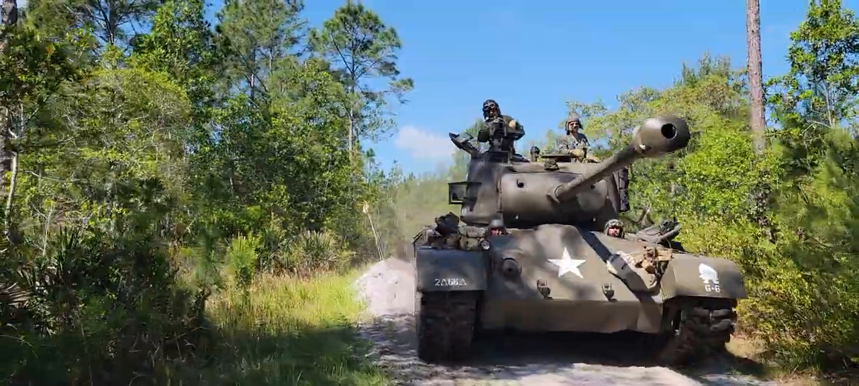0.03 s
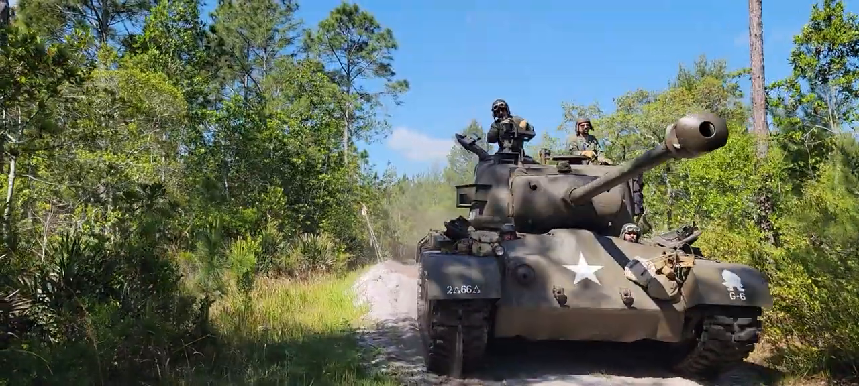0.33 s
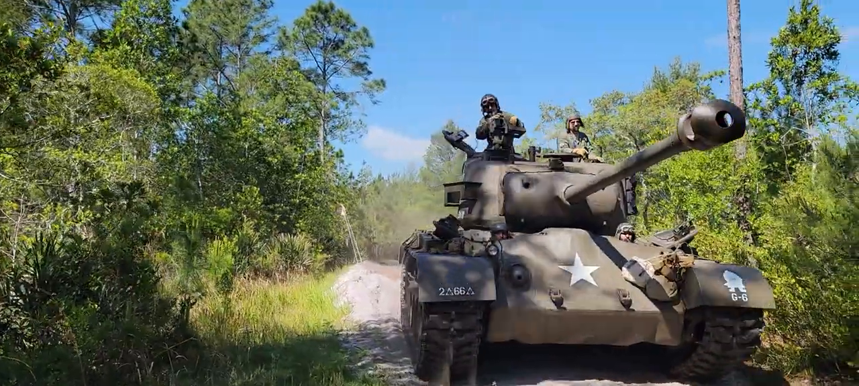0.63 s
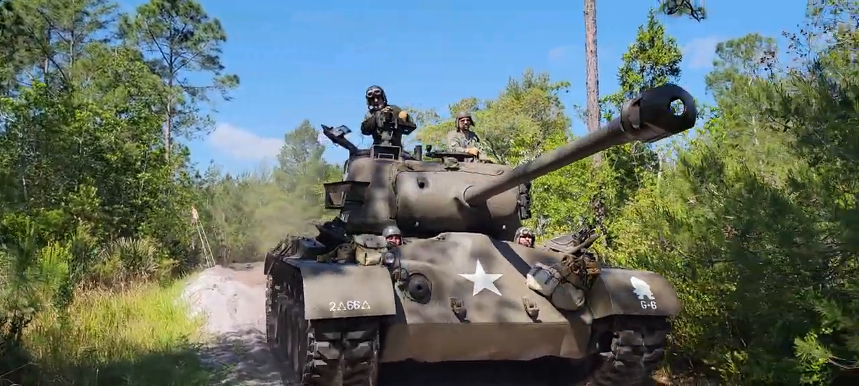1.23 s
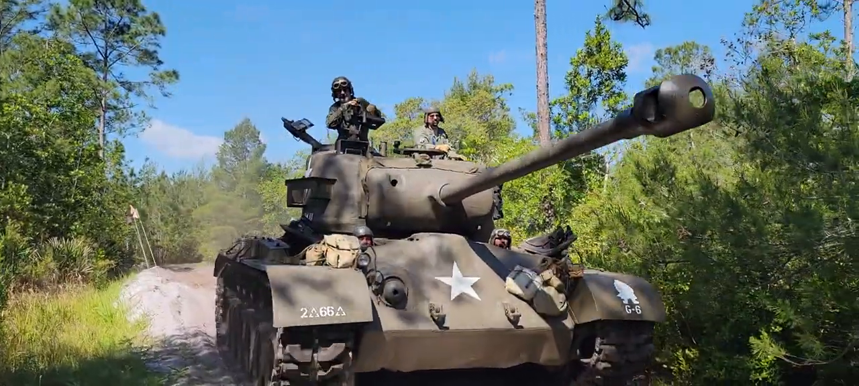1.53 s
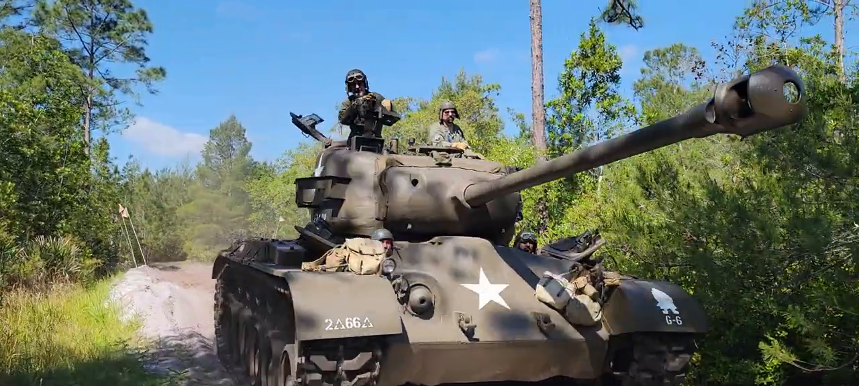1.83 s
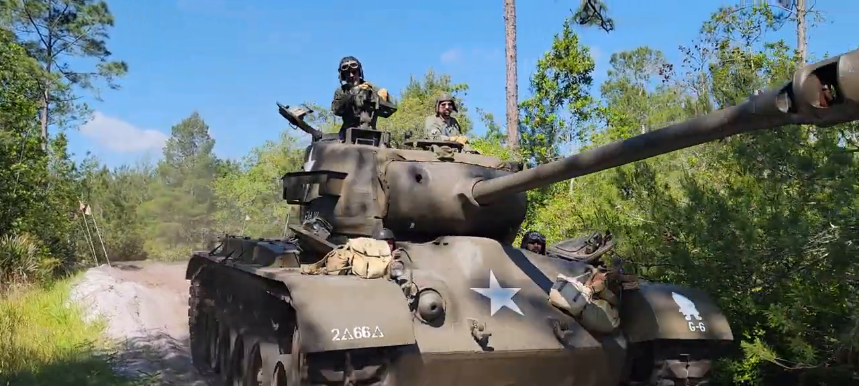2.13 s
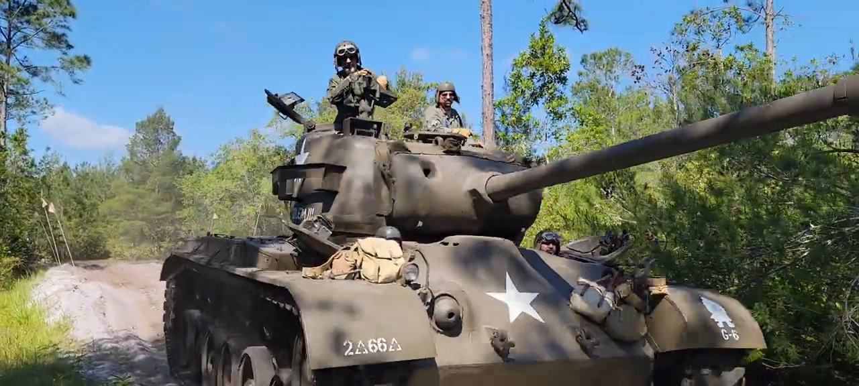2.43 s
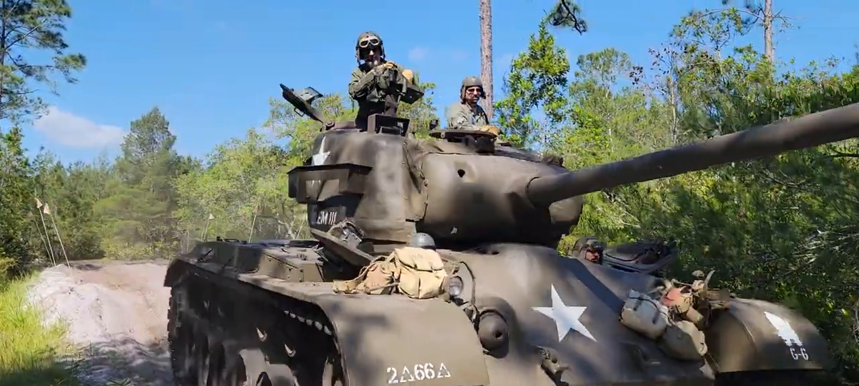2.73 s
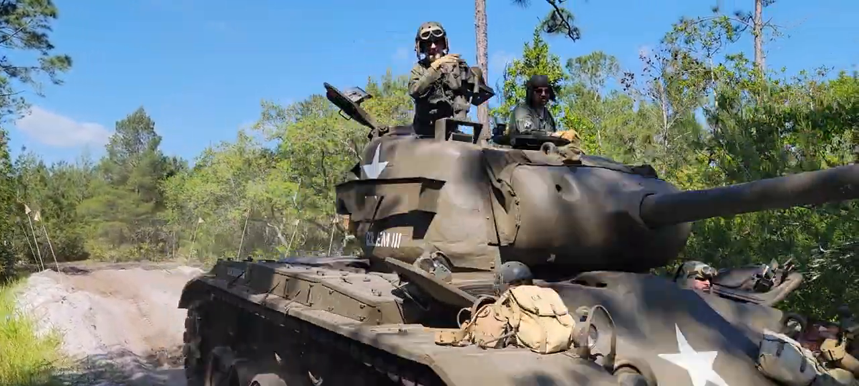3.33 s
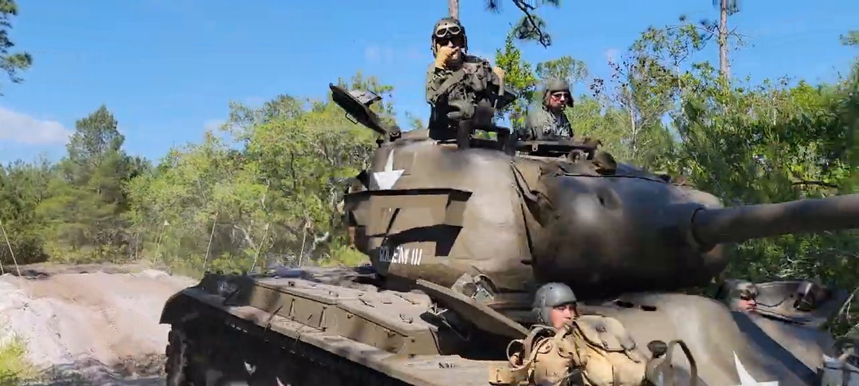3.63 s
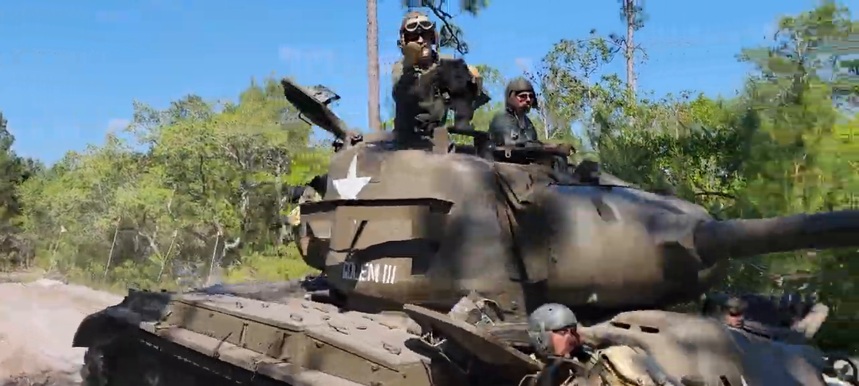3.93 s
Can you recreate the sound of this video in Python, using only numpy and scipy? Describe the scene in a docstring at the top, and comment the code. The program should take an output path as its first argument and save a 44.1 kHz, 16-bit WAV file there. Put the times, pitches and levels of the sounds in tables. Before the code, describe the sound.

The low engine of a tank growls as it speeds up, settles, then picks up again, heading toward the microphone through woods. Its metal tracks clatter and churn sand, with brief high squeaks that come more often later.

```python
"""A tank's V8 revs up, eases off and pulls again as it drives up a sandy woodland track to the listener.
Exhaust pulses give a deep firing note; unequal cylinders add a lope once per crank turn.
The exhaust growls under load and the gears whine faintly. Steel track links rattle and churn the sand;
dry track pins stick and slip in short squeaks that echo off the trees."""
import sys
import numpy as np
from scipy import signal
from scipy.fft import rfft, irfft
from scipy.io import wavfile

SR = 44100
rng = np.random.default_rng(int(sys.argv[2]) if len(sys.argv) > 2 else 0)


def transcribe(signal):
    """Save signal, clipped to [-1, 1], as a 16-bit WAV file at the path in sys.argv[1]."""
    frames = np.atleast_2d(signal).T
    limited = np.clip(frames, -1, 1)
    pcm = np.round(limited * 32767).astype(np.int16)
    wavfile.write(sys.argv[1], SR, pcm)


N = 176400

# engine speed: time_s, firing_hz
ENGINE_SPEED = [(0, 33.3), (0.4, 39.4), (0.55, 43.5), (0.7, 47.6), (0.85, 51.2), (1, 53.6), (1.22, 55.9),
                (1.5, 53.9), (1.75, 51.5), (2, 49.9), (2.3, 48.9), (2.55, 48.7), (2.75, 49.5), (3, 52.3),
                (3.25, 54.4), (3.5, 55.2), (4, 55.5)]
# exhaust note: time_s, then level_db for each of FIRING_MULTIPLES
FIRING_LEVELS = [(0, -42, -16, -23, -27, -44), (0.15, -28, -20, -24, -25, -44),
                 (0.3, -23, -18.5, -18, -23, -43), (0.55, -16, -18, -18, -24, -46),
                 (0.68, -9, -36, -22, -29, -36), (0.85, -9, -24, -22, -37, -38),
                 (1.25, -9, -27, -28, -51, -42), (1.48, -11, -33, -28, -36, -43),
                 (1.68, -14, -37, -24, -34, -38), (1.9, -12, -30, -21, -37, -37),
                 (2.35, -15, -31, -19.5, -37, -27.5), (2.75, -12, -30, -19.5, -28, -22.5),
                 (3.05, -11, -31, -23, -41, -33), (3.4, -12, -38, -26, -31, -32),
                 (4, -13, -29, -23, -29, -32)]
# lines from unequal cylinders: firing_multiple, relative_db
LOPE_LINES = [(1.25, -38), (1.5, -41), (1.75, -38), (2.25, -36), (2.75, -33), (3.25, -31.5), (3.5, -38),
              (3.75, -39), (4.25, -35), (4.75, -36), (5.0, -36), (5.25, -36), (5.75, -35.5), (6.75, -41),
              (7.0, -42), (8.25, -42)]
# exhaust gas blast: time_s, relative_db
BLAST_LEVEL = [(0, -30), (.55, -26), (1.3, -30.5), (1.9, -24.5), (2.8, -20.5), (3.3, -24.5), (4, -23)]
# blast spectrum: freq_hz, density_db
BLAST_SPECTRUM = [(170, -5), (240, -7.5), (300, 0), (380, -1.5), (500, -9), (800, -23)]
# exhaust rumble: time_s, level_db
RUMBLE_LEVEL = [(0, -25), (.55, -21.5), (1.1, -27.5), (1.7, -25.5), (3.3, -30), (4, -35)]
# rumble spectrum: freq_hz, density_db
RUMBLE_SPECTRUM = [(35, -18), (70, 9.5), (110, 2), (220, 1)]
# track rattle: time_s, relative_db
RATTLE_LEVEL = [(0, -37.5), (0.3, -34.5), (0.65, -29.5), (1, -28), (1.6, -30), (2.8, -29.5), (3.3, -26),
                (3.8, -23), (4, -22)]
# rattle spectrum: freq_hz, density_db
RATTLE_SPECTRUM = [(250, 2.5), (400, 3), (520, -3.5), (680, 0), (850, -6.5), (1000, -6.5), (1350, -9),
                   (1600, -16.5), (2050, -15.5), (2800, -19), (4000, -48)]
# track pin squeaks: peak_s, decay_s, pitch_hz, level_db, left_minus_right_db
PIN_SQUEAKS = [(0.936, .016, 2595, -32.5, -2), (1.028, 0.036, 2590, -24.8, -3),
               (1.07, 0.028, 2606, -28.5, 0), (1.963, 0.023, 2482, -22.5, -5), (2.2, .018, 2570, -39, 0),
               (2.686, 0.027, 3745, -18.8, -9.5), (2.722, .016, 3720, -31, -7),
               (2.805, .026, 2590, -22.5, 4.5), (2.91, .028, 2553, -23.5, 2), (3.012, .016, 2494, -31, 1),
               (3.058, .02, 2490, -31.5, 1), (3.103, 0.028, 2480, -21, 3), (3.266, .026, 2520, -25.5, -1),
               (3.292, .016, 2596, -29, 0), (3.336, .022, 3760, -19.5, 3), (3.607, .016, 2533, -29, 1),
               (3.64, .012, 2560, -26, 1), (3.736, .018, 2610, -31.5, 3), (3.897, .013, 2543, -31, 7)]
# squeak overtones: pitch_multiple, relative_db
PIN_OVERTONES = [(2, -24), (3, -32), (5, -36)]
# gear whines: firing_multiple, peak_s, half_width_s, level_db
GEAR_WHINES = [(16.4, 2.35, .6, -37.5), (15.8, 2.2, .65, -41), (10.67, 3.42, .44, -33.5),
               (10.67, 1.4, .22, -36.5), (9, 3.7, .35, -35), (7.5, 2.1, .6, -38)]
# churned sand: time_s, level_db
SAND_LEVEL = [(0, -47.5), (0.3, -42.5), (0.55, -37), (0.75, -36), (1.15, -39), (1.55, -44.5), (1.95, -43.5),
              (2.9, -41.5), (3.55, -36), (4, -37)]
# sand spectrum: freq_hz, density_db
SAND_SPECTRUM = [(1200, 8), (2600, -0.5), (3400, 4.5), (5000, 2), (6800, -0.5), (8500, -7), (11000, -14),
                 (16000, -13)]
# fine top of the sand hiss: time_s, relative_db
FINE_HISS_LEVEL = [(0, -64), (0.3, -46.5), (0.6, -37.5), (0.85, -39.5), (1.2, -42.5), (1.55, -50.5),
                   (1.95, -51), (2.6, -46.5), (2.9, -40), (3.7, -41), (4, -33)]
# fine hiss spectrum: freq_hz, density_db
FINE_HISS_SPECTRUM = [(5000, -19), (8000, 3.5), (10000, -3.5), (13000, -2), (16000, -10)]
# likeness of the noise at the two ears: freq_hz, correlation
EAR_CORRELATION = [(150, 1), (300, 0.72), (600, 0.49), (1200, 0.2), (2500, 0.65), (5000, 0.11),
                   (9000, 0.033)]
# noise balance: freq_hz, left_minus_right_db
NOISE_PAN = [(60, -1.5), (300, 0.6), (1300, 1), (2600, 1.0), (5000, 0.5), (9000, 2), (15000, 0)]

FIRINGS_PER_TURN, FIRING_MULTIPLES = 4, (1, 2, 3, 4, 6)
SPEED_JITTER, FIRING_WAVER_DB, THROB_PER_MULTIPLE = .002, .6, .05
PIPE_TUNED_HZ, PIPE_WIDTH_HZ, PIPE_LAG_RAD = 53.5, 4, .57
ENGINE_PAN_DB, ENGINE_EAR_PHASE_RAD = -1.5, .23 * np.array([[-.5], [.5]])
LOPE_GAIN_DB, LOPE_REV_BOOST_DB, LOPE_WAVER_DB, LOPE_SCATTER_RAD = -4, 4, 3.5, 1.6
BLAST_GAIN_DB, BLAST_PUFF_DEPTH = -8, .6
REV_PEAK_S, REV_HALF_WIDTH_S = .6, .35
GROWL_HZ, GROWL_HALF_WIDTH_HZ, GROWL_DB = 500, 70, -40
RATTLE_GAIN_DB, LINK_GAIN_DB, LINK_HITS_PER_S, LINK_T60_S, LINK_SPREAD_DB = 2, -12.5, 200, .018, 1.5
SQUEAK_ATTACK_RATIO, SQUEAK_WAVER, SQUEAK_ROUGH_DB = .7, .007, 1.2
SQUEAK_BEAT_HZ, SQUEAK_TWIN_DB, HULL_SHADE_DB_PER_DB = 55, -10, .8
GEAR_WAVER_DB, GEAR_WAVER_RAD = 3, .8
FINE_HISS_GAIN_DB = -5
WOODS_T60_S, WOODS_DB = .25, -15
RIGHT_EAR_DELAY_S, CUTOFF_HZ = .0001, 15750


def firing_note(firing_rad, firing_hz):
    """Exhaust pulses sharpen as the firing rate reaches the pipe's tuning; overtones throb each turn."""
    off_tune = np.clip((PIPE_TUNED_HZ - firing_hz) / PIPE_WIDTH_HZ, 0, 1)
    crank_swing = np.cos((firing_rad - np.pi) / FIRINGS_PER_TURN)
    note = 0
    for multiple, level_db in zip(FIRING_MULTIPLES, in_time(FIRING_LEVELS)):
        lag_rad = PIPE_LAG_RAD * off_tune * min(multiple - 1, 2) ** 2
        phase_rad = multiple * firing_rad - lag_rad + ENGINE_EAR_PHASE_RAD
        throb = rms_one(1 - THROB_PER_MULTIPLE * (multiple - 1) * crank_swing)
        note += throb * tone(phase_rad, level_db + FIRING_WAVER_DB * drift(13))
    return note


def cylinder_lope(thump_rad, blast_db):
    """Unequal cylinders add multiples of the crank rate, stronger as the revs start to climb."""
    uneven_db = LOPE_GAIN_DB + LOPE_REV_BOOST_DB * swell(REV_PEAK_S, REV_HALF_WIDTH_S)
    lope = 0
    for multiple, line_db in LOPE_LINES:
        phase_rad = multiple * thump_rad + LOPE_SCATTER_RAD * rng.standard_normal()
        follow_db = min(.29 * multiple, 1.2) * (blast_db - blast_db.mean())
        level_db = line_db + uneven_db + follow_db + LOPE_WAVER_DB * drift(1.32)
        lope -= tone(phase_rad + ENGINE_EAR_PHASE_RAD, level_db)
    return lope


def exhaust(firing_rad, firing_hz):
    """Firing note, lope, low rumble and a blast of gas that swells once per crank turn."""
    blast_db, = in_time(BLAST_LEVEL)
    rumble_db, = in_time(RUMBLE_LEVEL)
    thump_rad = firing_rad + np.pi * (FIRINGS_PER_TURN - 1)  # zero at the turn's strongest firing
    tones = firing_note(firing_rad, firing_hz) + cylinder_lope(thump_rad, blast_db)
    puffs = np.exp(BLAST_PUFF_DEPTH * np.cos(thump_rad / FIRINGS_PER_TURN) + .068 * np.cos(thump_rad))
    blast = from_db(BLAST_GAIN_DB + blast_db) * banded_noise(BLAST_SPECTRUM, flicker_db=.9, rate_hz=47)
    rumble = from_db(rumble_db) * banded_noise(RUMBLE_SPECTRUM, flicker_db=1.5, rate_hz=7.8)
    return tones * pan(ENGINE_PAN_DB) + rms_one(puffs) * blast + rumble


def growl(firing_rad, firing_hz):
    """Under load, multiples of the crank rate sweep up through an exhaust resonance."""
    out = 0
    for crank_order in range(32, 60):
        multiple = crank_order / FIRINGS_PER_TURN
        resonance = 1 / (1 + ((multiple * firing_hz - GROWL_HZ) / GROWL_HALF_WIDTH_HZ) ** 2)
        phase_rad = multiple * firing_rad + 2 * np.pi * rng.random() + .5 * drift(9.2)
        out += resonance * tone(phase_rad, GROWL_DB)
    return swell(REV_PEAK_S, REV_HALF_WIDTH_S) * out


def tracks(mode_count=24):
    """Steel links knock at random over a dense rattle."""
    level_db, = in_time(RATTLE_LEVEL)
    hits = np.flatnonzero(rng.random(N) < LINK_HITS_PER_S / SR)
    strengths = from_db(LINK_SPREAD_DB * np.minimum(rng.exponential(1, len(hits)), 4))
    knocks = 0
    for mode_hz in np.geomspace(450, 3000, mode_count) * rng.uniform(.99, 1.03, mode_count):
        both_ears = rng.standard_normal(len(hits))
        each_ear = .57 * rng.standard_normal((2, len(hits)))
        clicks = np.zeros((2, N))
        clicks[:, hits] = strengths * (both_ears + each_ear)
        gain = from_db(at_hz(RATTLE_SPECTRUM, mode_hz)) * np.sqrt(mode_hz)
        knocks += gain * ring(clicks, mode_hz, LINK_T60_S)
    rattle = from_db(RATTLE_GAIN_DB) * banded_noise(RATTLE_SPECTRUM, flicker_db=1.44, rate_hz=32)
    return from_db(level_db) * (rattle + from_db(LINK_GAIN_DB) * rms_one(knocks))


def pin_squeaks():
    """Dry pins stick and slip: two close modes beat. The hull dulls the far, right-hand track."""
    time_s, out = np.arange(N) / SR, np.zeros((2, N))
    waver = 1 + SQUEAK_WAVER * drift(150)
    rough_db = SQUEAK_ROUGH_DB * drift(60)
    for peak_s, decay_s, pitch_hz, level_db, pan_db in PIN_SQUEAKS:
        near = np.abs(time_s - peak_s) < 2 * decay_s
        since_s = time_s[near] - peak_s
        width_s = np.where(since_s < 0, SQUEAK_ATTACK_RATIO * decay_s, decay_s)
        envelope = from_db(level_db + rough_db[near]) * np.exp(-2 * (since_s / width_s) ** 2)
        phase_rad = 2 * np.pi * np.cumsum(pitch_hz * waver[near]) / SR
        twin = tone(phase_rad - 2 * np.pi * (SQUEAK_BEAT_HZ * since_s + rng.random()), SQUEAK_TWIN_DB)
        shade_db = HULL_SHADE_DB_PER_DB * pan_db
        overtones = sum(tone(multiple * phase_rad, db + shade_db) for multiple, db in PIN_OVERTONES)
        out[:, near] += pan(pan_db) * envelope * (tone(phase_rad, 0) + twin + overtones)
    return out


def gear_whine(firing_rad):
    """Wavering whines locked to the engine, each swelling and fading."""
    out = 0
    for multiple, peak_s, half_width_s, level_db in GEAR_WHINES:
        waver_rad = GEAR_WAVER_RAD * (drift(2.6) + .5 * np.array([drift(11), drift(2.3)]))
        whine = tone(multiple * firing_rad + waver_rad, level_db + GEAR_WAVER_DB * drift(21))
        out += swell(peak_s, half_width_s) * whine
    return out


def sand():
    """Sand spills off the tracks: a smooth hiss with a finer top."""
    sand_db, = in_time(SAND_LEVEL)
    fine_db, = in_time(FINE_HISS_LEVEL)
    hiss = banded_noise(SAND_SPECTRUM, flicker_db=.95, rate_hz=8.9)
    fine_hiss = banded_noise(FINE_HISS_SPECTRUM, flicker_db=1.1, rate_hz=20)
    return from_db(sand_db) * hiss + from_db(fine_db + FINE_HISS_GAIN_DB) * fine_hiss


def tree_echoes(source):
    """Trees scatter the sound, differently to each ear."""
    time_s = np.arange(SR // 2) / SR
    tail = rng.standard_normal((2, len(time_s))) * from_db(-60 * time_s / WOODS_T60_S)
    tail /= np.sqrt(np.sum(tail ** 2, axis=1, keepdims=True))
    return from_db(WOODS_DB) * signal.fftconvolve(source, tail, axes=1)[:, :N]


def banded_noise(spectrum, flicker_db, rate_hz):
    """Stereo noise, rms 1; each band has its own flicker, width and pan."""
    bottom_hz, top_hz = spectrum[0][0], spectrum[-1][0]
    band_count = int(2.5 * np.log2(top_hz / bottom_hz)) + 1
    edges_hz = np.geomspace(bottom_hz, top_hz, band_count + 1)
    shared_drift = drift(rate_hz)
    white = rng.standard_normal((2, 2, N))
    out = 0
    for k, (low_hz, high_hz) in enumerate(zip(edges_hz, edges_hz[1:])):
        bandpass = signal.butter(2, [low_hz, high_hz], "band", fs=SR, output="sos")
        mid, side = signal.sosfilt(bandpass, white[k % 2])  # adjacent bands are independent
        centre_hz = np.sqrt(low_hz * high_hz)
        correlation = at_hz(EAR_CORRELATION, centre_hz)
        band = np.sqrt(1 + correlation) * mid + np.sqrt(1 - correlation) * side * [[1], [-1]]
        gain_db = at_hz(spectrum, centre_hz) + flicker_db * (.5 * shared_drift + drift(rate_hz))
        out += from_db(gain_db) * pan(at_hz(NOISE_PAN, centre_hz)) * band
    return rms_one(out)


def ring(clicks, mode_hz, t60_s):
    """Each click rings one damped mode."""
    radius, step_rad = from_db(-60 / (t60_s * SR)), 2 * np.pi * mode_hz / SR
    feedback = [1, -2 * radius * np.cos(step_rad), radius ** 2]
    return signal.lfilter([0, np.sin(step_rad)], feedback, clicks + 1e-18)


def drift(rate_hz):
    """Smooth random wander, rms 1."""
    hop, warmup = 40, 2000
    pole = np.exp(-2 * np.pi * rate_hz * hop / SR)
    white = rng.standard_normal(N // hop + warmup + 2)
    slow = signal.lfilter([1], [1, -2 * pole, pole ** 2], white)[warmup:]
    return np.interp(np.arange(N) / hop, np.arange(len(slow)), rms_one(slow))


def swell(peak_s, half_width_s):
    """Smooth rise, hold and fall; top 1."""
    return np.exp(-.5 * ((np.arange(N) / SR - peak_s) / half_width_s) ** 4)


def tone(phase_rad, rms_db):
    """Sinusoid at an rms level."""
    return np.sqrt(2) * from_db(rms_db) * np.cos(phase_rad)


def in_time(table):
    """Each value column at every sample."""
    time_s, *columns = np.transpose(table)
    return [np.interp(np.arange(N) / SR, time_s, column) for column in columns]


def at_hz(table, freq_hz):
    """Table value on a log-frequency axis."""
    points_hz, values = np.transpose(table)
    return np.interp(np.log(freq_hz), np.log(points_hz), values)


def pan(left_minus_right_db):
    """Left and right gains."""
    return from_db(np.array([[.5], [-.5]]) * left_minus_right_db)


def from_db(db):
    """Decibels to gain."""
    return 10 ** (np.asarray(db) / 20)


def rms_one(x):
    """Scale to rms 1."""
    return x / np.sqrt(np.mean(x ** 2) + 1e-20)


def scene():
    """Engine plus running gear, which reaches the left ear first."""
    firing_hz, = in_time(ENGINE_SPEED)
    firing_rad = 2 * np.pi * np.cumsum(firing_hz * (1 + SPEED_JITTER * drift(8))) / SR
    whine, hiss, squeaks = gear_whine(firing_rad), sand(), pin_squeaks()
    left, right = whine + hiss + squeaks + tree_echoes(squeaks) + tracks()
    delay = np.exp(-2j * np.pi * np.fft.rfftfreq(N, 1 / SR) * RIGHT_EAR_DELAY_S)
    running_gear = np.array([left, irfft(rfft(right) * delay, N)])
    return exhaust(firing_rad, firing_hz) + growl(firing_rad, firing_hz) + running_gear


def record(dry):
    """Clip at full scale, then cut the top treble."""
    lowpass = signal.ellip(12, .1, 80, CUTOFF_HZ, fs=SR, output="sos")
    return signal.sosfilt(lowpass, np.clip(dry, -1, 1))


dry = scene()
out = record(dry)
transcribe(out)
```